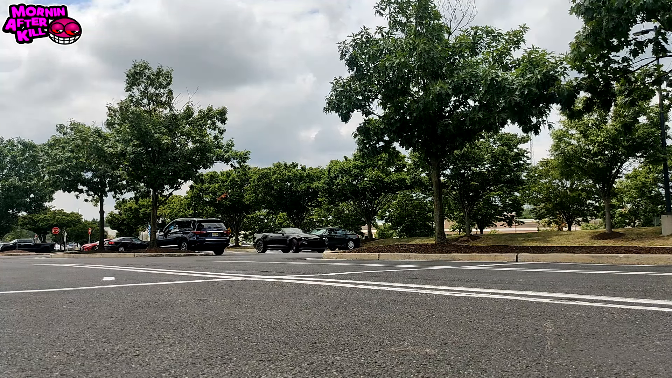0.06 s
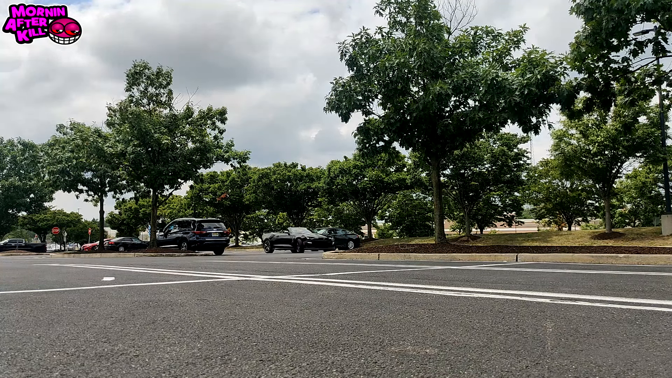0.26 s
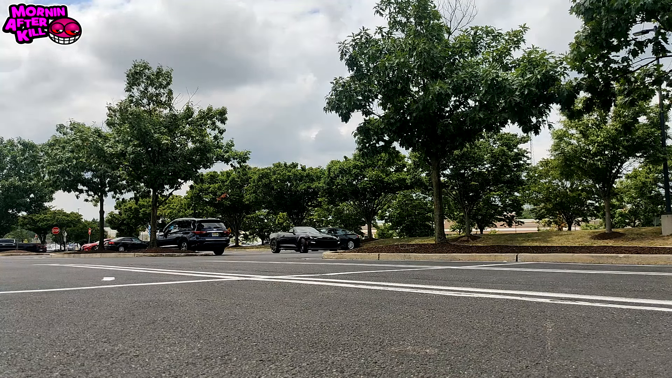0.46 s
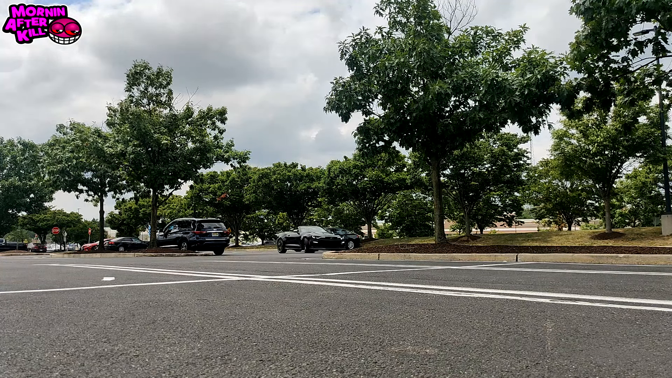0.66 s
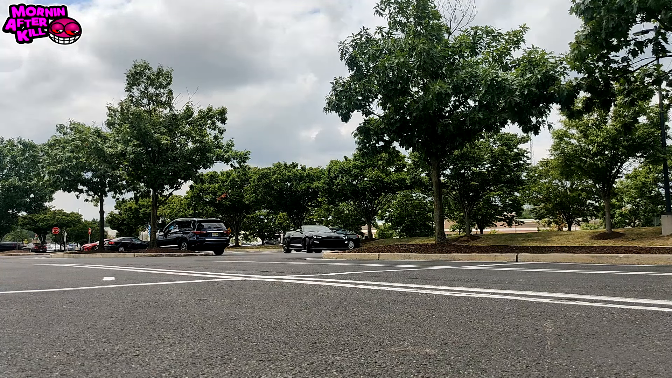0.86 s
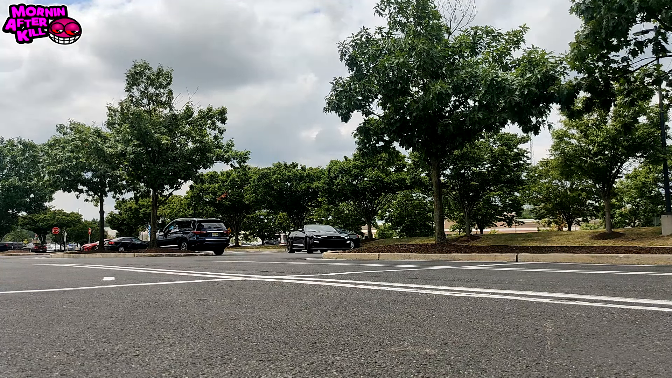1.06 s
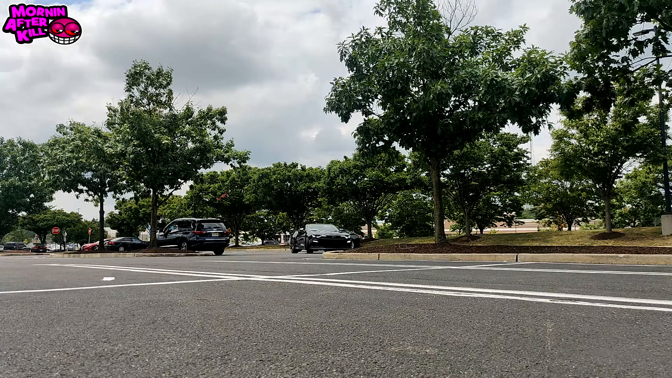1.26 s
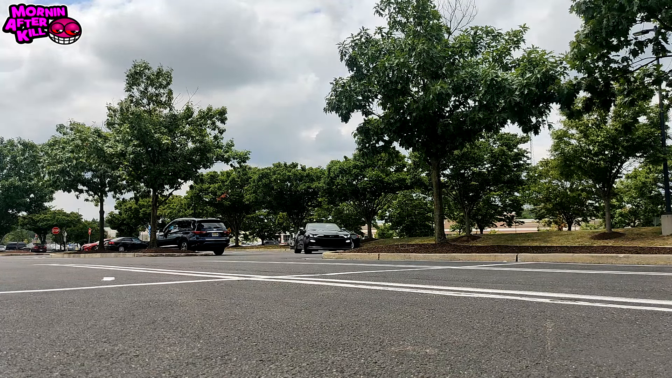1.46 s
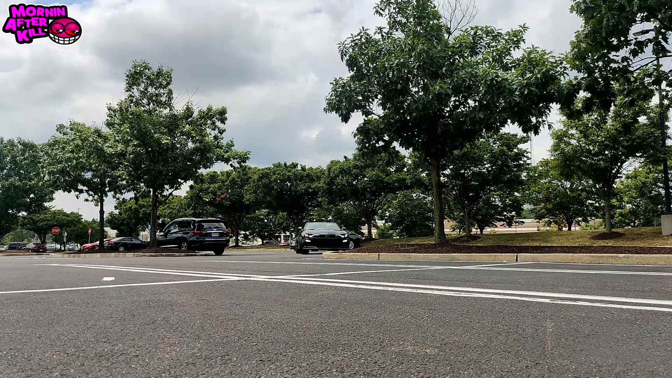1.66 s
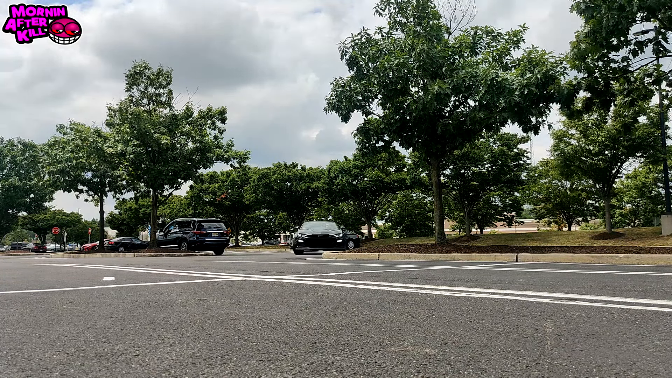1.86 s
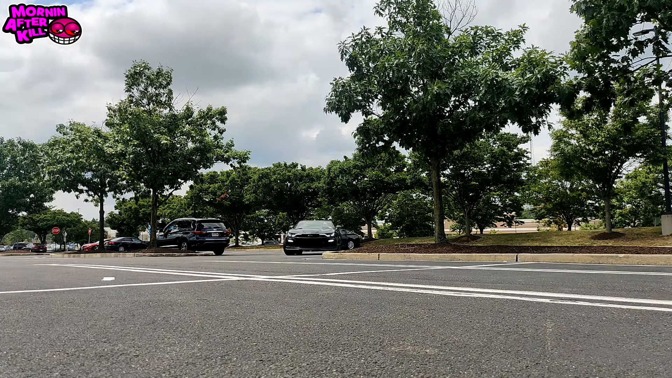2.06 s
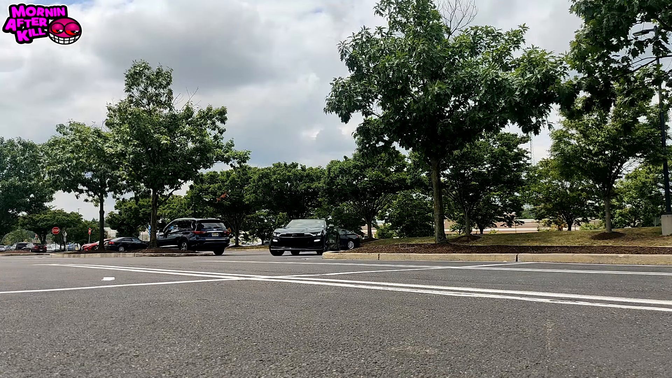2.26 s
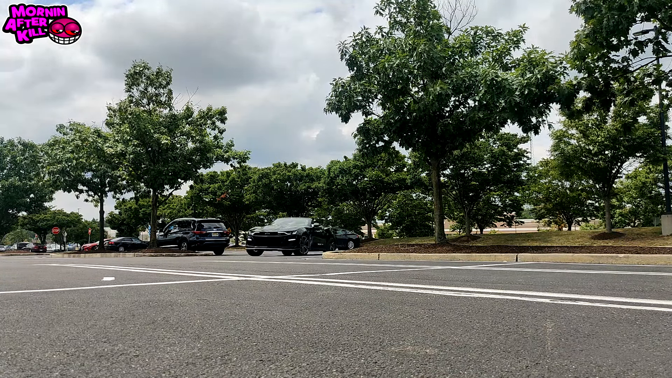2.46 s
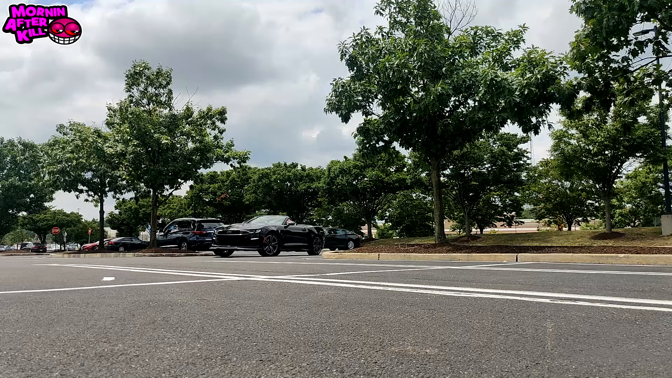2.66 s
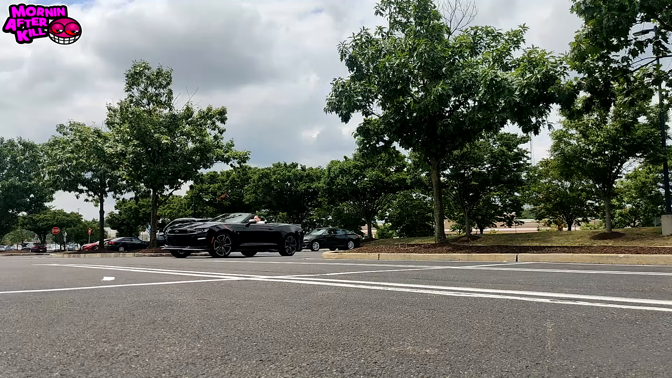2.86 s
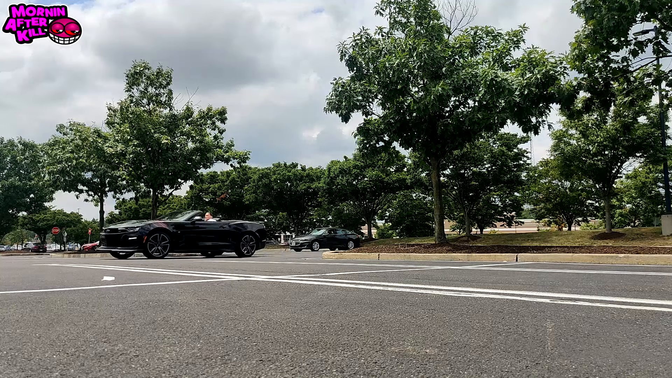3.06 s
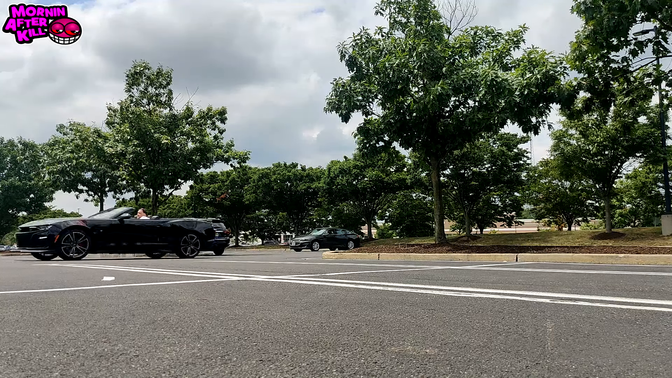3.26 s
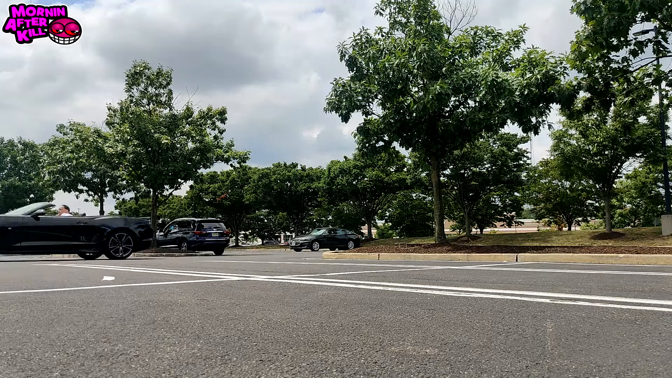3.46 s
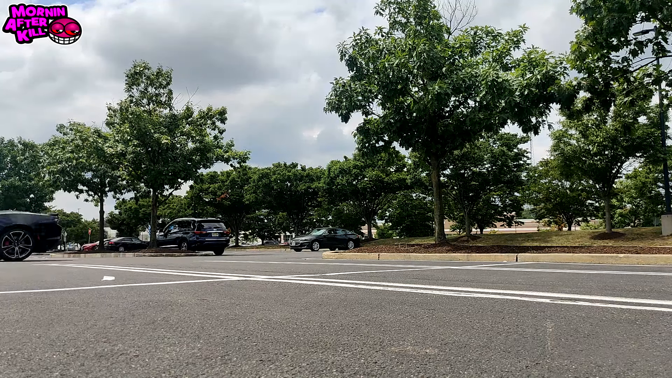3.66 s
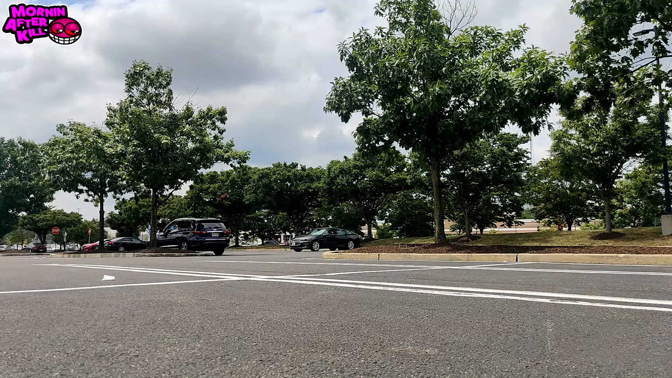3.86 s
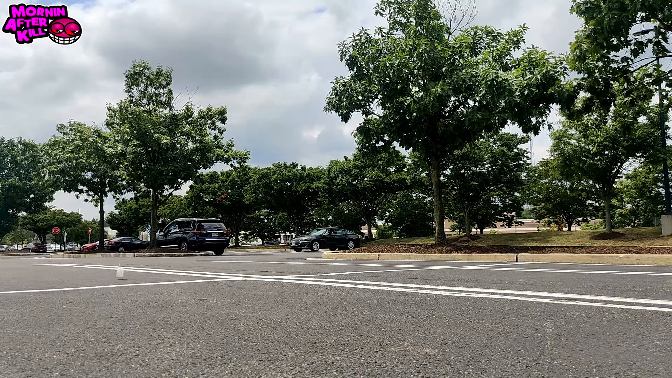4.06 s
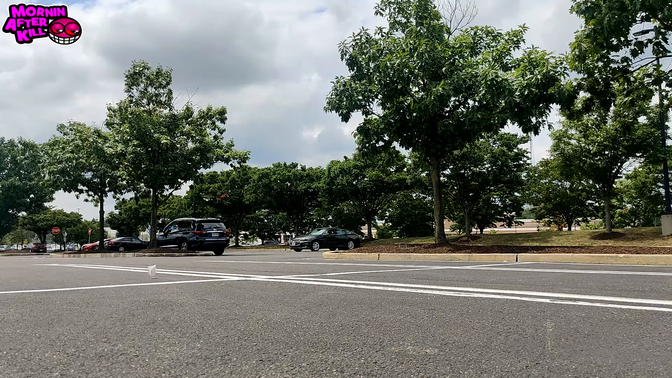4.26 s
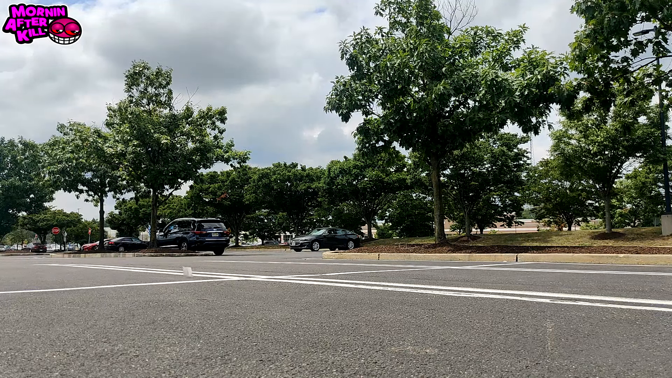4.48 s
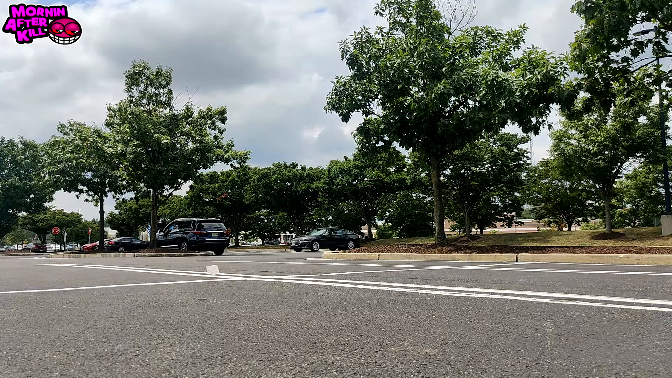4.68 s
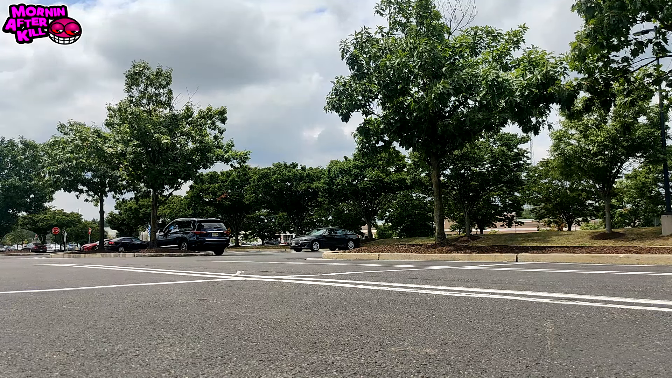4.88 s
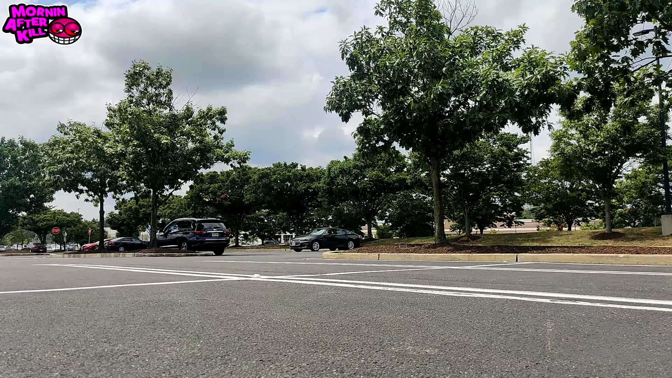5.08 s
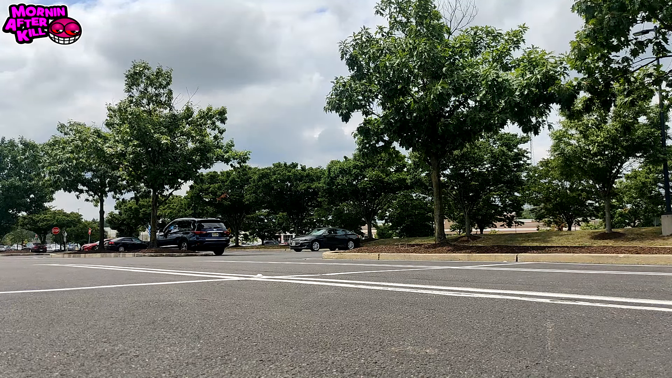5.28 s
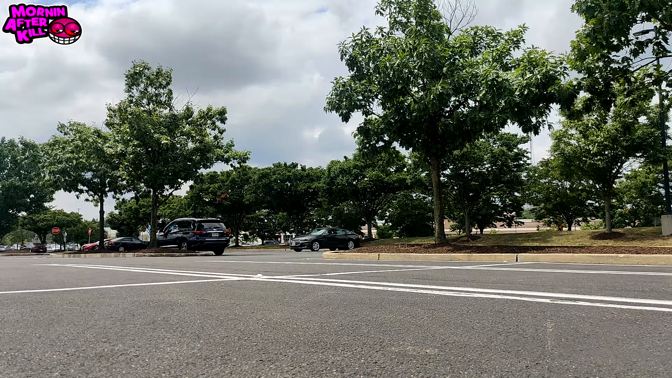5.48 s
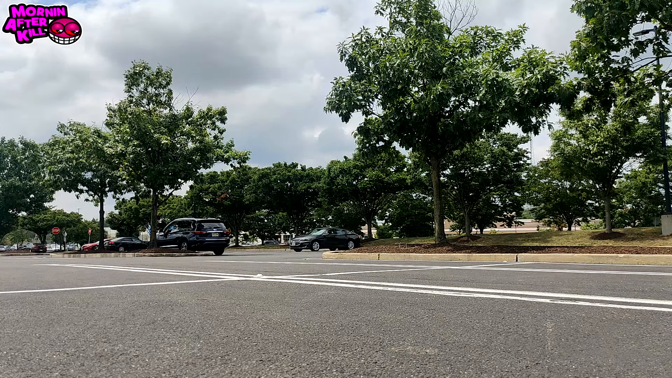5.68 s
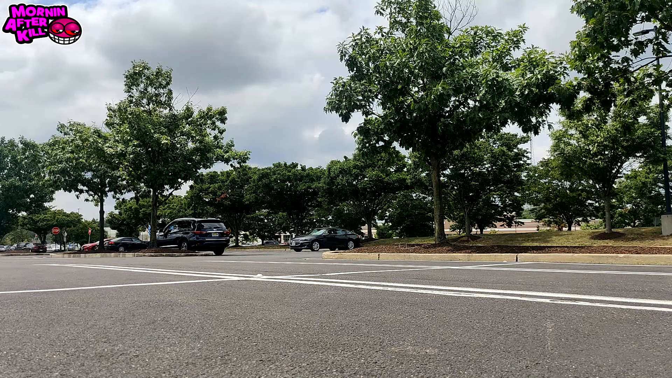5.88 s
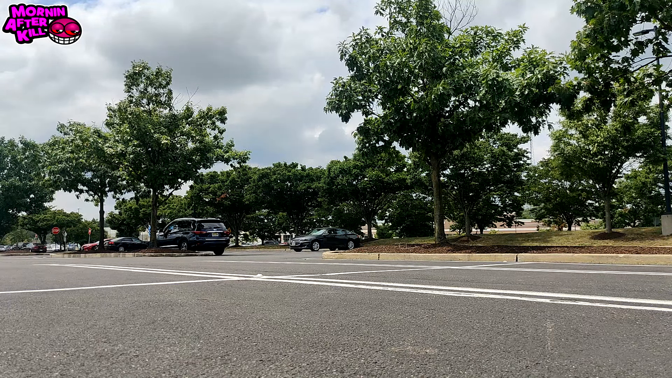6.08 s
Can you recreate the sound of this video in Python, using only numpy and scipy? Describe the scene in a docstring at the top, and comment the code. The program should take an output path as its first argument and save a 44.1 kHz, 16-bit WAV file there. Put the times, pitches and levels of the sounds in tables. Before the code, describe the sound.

Wind rumbles on the microphone as a V8 car accelerates past, its engine climbing, then dropping in pitch and fading.

```python
"""V8 convertible passing in a parking lot

The car rolls up, opens the throttle, passes right to left 2.4 m from a two-port microphone, lifts off
and burbles away. Its exhaust orders sweep through the pipe's resonances, tyres roar on the asphalt and
the lot's edges answer. Wind rumbles on the microphone over trees, far traffic and one bird; the
recorder's gain control ducks under the pass."""
import sys
import numpy as np
from scipy import signal
from scipy.fft import rfft, irfft, next_fast_len
from scipy.io import wavfile
from scipy.ndimage import uniform_filter1d, map_coordinates

SR = 44100
rng = np.random.default_rng(int(sys.argv[2]) if len(sys.argv) > 2 else 0)


def inscribe(sig):
    """Save sig as 16-bit PCM at rate SR to the path in sys.argv[1].

    A 1-D sig is mono; a 2-D sig holds one channel per row.
    Samples are clipped to [-1, 1] before scaling.
    """
    pcm = np.round(np.clip(np.atleast_2d(sig).T, -1, 1) * 32767)
    wavfile.write(sys.argv[1], SR, pcm.astype(np.int16))


N = 270330
TIME = np.arange(N) / SR
# the car's bearing at the microphone: t/s, lead of the left port/ms, left over right/dB
BEARING = [(0, -0.079, 4.5), (1.5, -0.27, 0), (2.25, 0.0089, 2), (3.25, 0.098, 0.9), (3.75, 0.1863, -0.3),
           (4.25, 0.42, 1), (4.75, 0.49, 2), (6.13, 0.48, 1)]


def amp(db):
    """Decibels to gain."""
    return 10 ** (np.asarray(db) / 20)


def unit(x):
    """Scale to rms 1."""
    return x / np.sqrt(np.mean(x ** 2) + 1e-20)


def along(points, hz):
    """Read (f/Hz, value) points on a log frequency axis."""
    f, v = np.transpose(points)
    return np.interp(np.log(hz + 1), np.log(f + 1), v)


def curves(rows):
    """One value per sample for each column after the time."""
    s, *cols = np.transpose(rows)
    return [np.interp(TIME, s, c) for c in cols]


def during(start, end, fade):
    """1 between two times, dying away outside."""
    return np.exp(-np.abs(TIME - np.clip(TIME, start, end)) / fade)


def swell(s, rise, fall, db):
    """A bell-shaped gain that peaks at time s."""
    return amp(db) * np.exp(-.5 * ((TIME - s) / np.where(TIME < s, rise, fall)) ** 2)


def wobble(rate):
    """A smooth random curve, rate knots a second."""
    coarse = TIME[::64]
    curve = map_coordinates(rng.standard_normal(2048), [coarse * rate], mode="wrap")
    return np.interp(TIME, coarse, curve)


def filtered(x, gain):
    """x times a gain that depends on frequency."""
    m = next_fast_len(N + 8192)
    return irfft(rfft(x, m) * gain(np.fft.rfftfreq(m, 1 / SR)), m)[..., :N]


def noise(spectrum, gate=1):
    """Gated noise of rms 1, coloured by (f/Hz, level/dB) points."""
    return unit(filtered(gate * rng.standard_normal(N), lambda hz: amp(along(spectrum, hz))))


def tick(s, db, pitch_hz):
    """A dry snap of noise, falling 21 dB an octave either side of its pitch."""
    snap = (TIME >= s) * during(s, s, fade=0.0013) * rng.standard_normal(N)
    return amp(db) * filtered(snap, lambda hz: unit(amp(-21 * np.abs(np.log2((hz + 1) / pitch_hz)))))


def air(spectrum, apart):
    """Noise common to both ports, plus a share of each port's own."""
    return unit(noise(spectrum) + apart * np.array([noise(spectrum), noise(spectrum)]))


def ports(x, scatter=0):
    """x[0] reaches the two ports at different times; x[1:], if given, is scattered from all around."""
    shift = curves(BEARING)[0] / 1000 * SR / 2  # half the lead, in samples
    direct = np.array([map_coordinates(x[0], [np.arange(N) + side * shift]) for side in (1, -1)])
    return direct if len(x) == 1 else (direct + scatter * np.array(x[1:])) / np.hypot(1, scatter)


def drive_by(pass_s=3.737, closest_m=2.42, car_m_per_s=9.1):
    """Nearness of the car on a straight path (1 at its closest) and its Doppler factor."""
    past_m = car_m_per_s * (TIME - pass_s)
    distance_m = np.hypot(closest_m, past_m)
    return closest_m / distance_m, 1 - car_m_per_s / 343 * past_m / distance_m


def surroundings():
    """The hush of the lot, far traffic receding and leaves rustling in gusts, a little to the left."""
    # spectra of the three: f/Hz, level/dB
    hush_colour = [(60, 0.5), (250, 7), (500, 9.5), (900, -12.5), (1500, -10.5), (2800, -27), (4500, -21.5),
                   (7000, -41), (9000, -64.5), (16000, -51)]
    traffic_colour = [(300, -42.5), (600, 0), (850, 1), (1300, -5), (2500, -13), (7000, -26),
                      (12000, -69.5)]
    leaf_colour = [(1500, -18.5), (2700, -11), (3500, -9.5), (4700, -13.5), (6500, -19.5), (9000, -26.5),
                   (16000, -37.5)]
    # gusts in the trees: t/s, rise/s, fall/s, level/dB
    gusts = [(.1, 0.54, 0.317, -50), (1.6, 0.38, 0.1, -46), (2.45, 0.45, 0.57, -42.5)]
    hush = amp(-40.5 + wobble(1.6)) * air(hush_colour, apart=0.93)
    traffic = amp(-38.5 - 1.62 * TIME) * air(traffic_colour, apart=1.0)
    rustle = sum(swell(*row) for row in gusts) * amp(-0.5 + 0.97 * wobble(12))
    leaves = rustle * air(leaf_colour, apart=3.5)
    return (hush + traffic + leaves) * amp([[.6], [-.6]])


def bird():
    """One short, wavering chirp, far off."""
    # the chirp: t/s, rise and fall/s, f/Hz, level/dB
    chirps = [(2.283, 0.045, 2910, -44)]
    return sum(swell(s, half, half, db) * np.sin(2 * np.pi * hz * TIME + 2 * wobble(200))
               for s, half, hz, db in chirps)


def wind():
    """Wind rumbles on the microphone, nearly alike at both ports."""
    # spectrum of the rumble: f/Hz, level/dB
    rumble = [(8, -6), (22, 2), (40, 1.5), (58, 1.5), (80, -3.5), (130, -7.5), (220, -11), (400, -30.5),
              (1500, -68)]
    return amp(-24.5 + 0.39 * wobble(0.68)) * air(rumble, apart=0.23) * amp([[.5], [-.5]])


def lot_reverb(x):
    """Trees, parked cars and buildings send back a thin, late answer."""
    # reverberation of the lot: f/Hz, time to fall 60 dB/s
    decay = [(100, 0.31), (500, 0.81), (2000, 0.16), (10000, 0.099)]
    hz, t, bins = signal.stft(rng.standard_normal((2, SR)), SR, nperseg=256)
    tail = signal.istft(bins * amp(-60 * t / along(decay, hz)[:, None]), SR, nperseg=256)[1]
    late = np.pad(x.mean(axis=0), (1200, 0))[None]
    return amp(-18) * signal.fftconvolve(late, tail / np.linalg.norm(tail[0]), axes=1)[:, :N]


def parked_cars_echo(x, delay_s=.16, dull_hz=900):
    """A row of parked cars returns one dull echo, which beats against the changing engine note."""
    return amp(-19) * filtered(x, lambda hz: np.exp(-2j * np.pi * hz * delay_s) / (1 + (hz / dull_hz) ** 2))


def tyres(near, diffuse_hz=5360):
    """Tread roar and fine hiss on coarse asphalt grow with nearness and in a turn; stones are flicked."""
    # spectra of the tread: f/Hz, level/dB
    roar_colour = [(100, -43), (400, 5), (900, 7), (1400, 4.5), (2200, 1), (3200, -6), (4700, -9.5),
                   (7000, -18), (9000, -25), (16000, -30.5)]
    hiss_colour = [(2000, -28), (6000, -14.5), (10000, -4.5), (13000, 0), (16000, 1.5)]
    # flicked stones: t/s, level/dB, f/Hz
    grit = [(3.907, -12, 3200), (4.673, -38.5, 11000), (4.915, -40, 14000)]
    scrub = swell(2.86, 0.17, 0.115, 0)  # out of the turn
    spread = 0.42 + 0.82 * near ** 2  # close by, the four wheels lie in different directions
    crossover = lambda hz: np.arctan((hz / diffuse_hz) ** 2)  # the treble arrives from all around
    aimed = ports([noise(roar_colour) for _ in range(3)], scatter=spread)
    diffuse = np.array([noise(roar_colour), noise(roar_colour)])
    roar = filtered(aimed, lambda hz: np.cos(crossover(hz)))
    roar += filtered(diffuse, lambda hz: np.sin(crossover(hz)))
    roar *= np.hypot(amp(-22) * near ** 1.16, amp(-26.5) * scrub) * amp(0.57 * wobble(19))
    grain = amp(1.7 * wobble(280))
    hiss = ports([noise(hiss_colour, grain) for _ in range(3)], scatter=3.9)
    hiss *= np.hypot(amp(-50.5) * near ** 0.52, amp(-46.5) * scrub)
    stones = sum(tick(*row) for row in grit)
    return roar * amp([[.4], [-.4]]) + hiss * amp([[1.6], [-1.6]]) + ports([stones])


def pipe(hz, ring):
    """Gain of the exhaust: the muffler's slope with standing-wave peaks, scaled by ring."""
    # muffler response: f/Hz, level/dB
    muffler = [(30, -36), (100, -16.5), (200, -5.5), (380, -8), (560, -6), (680, -8), (850, -9),
               (1050, -14.5), (1250, -17.5), (2000, -21.5), (4000, -68.5)]
    # pipe resonances: f/Hz, width/Hz, level/dB
    resonances = [(275.4, 99, 8), (368, 52, 4), (438.1, 35.4, 11), (532.4, 14, 5), (673, 23, 4.5),
                  (798, 22, 6)]
    peaks_db = sum(db / (1 + (2 * (hz - centre) / width) ** 2) for centre, width, db in resonances)
    return amp(along(muffler, hz) + ring * peaks_db)


def swept_pipe(hz, ring):
    """The pipe's gain along a gliding pitch, worked out every 64 samples."""
    return np.interp(TIME, TIME[::64], pipe(hz[::64], ring))


def tone(cycle, order, drift):
    """One harmonic of the engine cycle, its phase wandering by about drift radians."""
    return np.sqrt(2) * np.sin(2 * np.pi * (order * cycle + rng.random()) + drift * wobble(22))


def firings(cycle, sharpness):
    """Envelope of one gas puff per firing, eight a cycle, each of its own size."""
    count, age = np.divmod(8 * cycle, 1)
    size_db = 3 * rng.standard_normal(4096)
    return amp(size_db[count.astype(int)]) * np.exp(-sharpness * age)


def gas_jet(cycle):
    """Gas hisses out, surging with each firing, as the tailpipes turn to the microphone."""
    # spectrum of the jet: f/Hz, level/dB
    colour = [(200, -22), (900, 1.5), (1700, 0), (2500, 3), (4500, -6), (7000, -15.5), (9000, -30.5),
              (16000, -33)]
    # blasts of gas: t/s, rise/s, fall/s, level/dB
    blasts = [(3.605, 0.068, 0.13, -19), (3.807, 0.018, 0.025, -22), (3.875, 0.061, 0.08, -18.5)]
    surge = 1 + firings(cycle, sharpness=0.65)
    hiss = ports([noise(colour, surge) for _ in range(3)], scatter=1.61)
    return sum(swell(*row) for row in blasts) * hiss


def cracks():
    """Sharp cracks in the exhaust under load."""
    # cracks: t/s, level/dB
    snaps = [(3.229, -10), (3.856, -8), (3.89, -7)]
    return sum(tick(s, db, pitch_hz=900) for s, db in snaps)


def bark(cycle):
    """Heard close behind the car, each bank barks once a cycle, the weaker half a cycle later."""
    # spectrum of a bark: f/Hz, level/dB
    colour = [(250, -29.5), (600, 0.5), (1000, 15), (1600, -1), (2400, 1.5), (5000, -41.5), (12000, -65)]
    beat = lambda turns: np.diff(np.floor(turns), prepend=np.floor(turns[0]))
    blows = (beat(cycle) + amp(-11.5) * beat(cycle + .5)) * amp(2.8 * wobble(40))
    return during(3.48, 4.7, fade=.03) * unit(filtered(blows, lambda hz: amp(along(colour, hz))))


def puffs(cycle, load):
    """Turbulent gas puffs through the pipe, stronger off the throttle."""
    turbulence = firings(cycle, sharpness=0.9) * rng.standard_normal(N)
    return amp(4.6 - 13.3 * load) * unit(filtered(turbulence, lambda hz: pipe(hz, ring=0.69)))


def lope(cycle, speed, near, smooth_hz=30):
    """Gain flutter from uneven cylinders: a growl at low revs, away from the microphone."""
    shake = unit(sum(tone(cycle, order, drift=.8) for order in (1, 2, 3)))
    return 1 + 0.52 * np.maximum(1 - (speed / smooth_hz) ** 2, 0) * (1 - near) * shake


def booms(cycle, car_hz, load, near, leading, drone_order):
    """Leading orders sing as they cross a resonance under load; single orders boom at set times."""
    # booms: t/s, rise/s, fall/s, level/dB, order
    swells = [(1.9, 0.48, 0.063, -42, 31), (2.19, 0.078, 0.1336, -18, 8), (2.185, 0.12, 0.028, -22.5, 16),
              (2.57, 0.079, 0.056, -27, 16), (2.62, 0.31, 0.23, -24.5, 5), (2.61, .17, .15, -27.5, 9),
              (2.83, 0.025, .03, -24, 20), (2.89, 0.069, 0.042, -24.5, 16), (2.86, 0.052, 0.2, -30.5, 19),
              (3.215, 0.1, 0.096, -24.5, 10), (3.15, 0.05, 0.079, -25.5, 16), (3.21, .06, 0.072, -29, 24),
              (3.41, .04, .07, -24, 26), (3.6, .08, 0.1, -16, 18), (3.39, 0.059, 0.072, -21.5, 22),
              (3.66, 0.073, 0.085, -10, 16), (3.672, 0.16, 0.14, 0, 8), (3.66, 0.032, .045, -15.5, 24),
              (3.935, 0.018, 0.043, -9, 16), (3.97, 0.055, 0.031, -13, 10), (4.03, 0.057, 0.083, -22, 8),
              (4.08, 0.035, 0.061, -19, 16), (4.1, .03, 0.032, -19, 22), (4.28, 0.042, 0.042, -22, 18),
              (3.6, 0.14, 0.2, -25.5, 12)]
    # late burns in the pipe off the throttle: t/s, level/dB
    late_burns = [(4.115, -17), (4.645, -20), (4.775, -21.5), (5.01, -22.5)]
    gains = {order: amp(db) * load * near * swept_pipe(order * car_hz, ring=1.754)
             for order, db in leading.items()}  # steady orders build up the resonances more
    for *shape, order in swells:
        gains[round(order)] = gains.get(round(order), 0) + swell(*shape)
    for s, db in late_burns:
        gains[drone_order] = gains.get(drone_order, 0) + swell(s, 0.0082, 0.0152, db)
    flicker_db = .3 + 1.8 * (1 - near) ** 2
    drift = .05 + .25 * (1 - near) ** 2 + .4 * (1 - load)
    return sum(gain * amp(flicker_db * wobble(25)) * tone(cycle, order, drift)
               for order, gain in gains.items())


def burble(cycle, car_hz, load, leading, drone_order):
    """The V8 burble: orders 3 to 47 through the pipe, wavering more off the throttle."""
    # uneven firing within each bank favours some orders: order, level/dB
    favoured = [(6, 3), (7, -2), (9, 5.5), (11, 5), (12, 2), (18, 1.5), (20, 3.5), (26, 3), (34, 2)]
    favour_db = {round(order): db for order, db in favoured}
    ring = 1 - 0.17 * load[::64]  # fast gas flow damps the resonances
    shares = {order: 1 - load for order in leading}  # under load these sing clean instead
    shares[drone_order] = amp(5 - 2 * load)
    total = np.zeros(N)
    for order in range(3, 48):
        gain = shares.get(order, 1) * amp(favour_db.get(order, 0) + (3.6 - 1.1 * load) * wobble(12))
        total += gain * swept_pipe(order * car_hz, ring) * tone(cycle, order, drift=.6 - .47 * load)
    return total


def engine(near, doppler, open_s=2.12, lift_s=4.13, drone_order=12):
    """The V8 revs up and lifts off; its firing cycle drives the sounds of the exhaust."""
    # engine speed: t/s, cycle rate/Hz
    revs = [(0, 14.34), (2.0, 14.2), (2.19, 16.8), (2.3, 19.2), (2.65, 24.6), (2.8, 27.3), (2.92, 28.4),
            (3.06, 28.2), (3.17, 28.1), (3.3, 29.9), (3.498, 33.22), (3.57, 34.0), (3.706, 33.7),
            (3.775, 34), (3.808, 31.6), (3.98, 26.7), (4.13, 24.15), (4.45, 23.5), (4.65, 20.6), (5, 21.6),
            (5.5, 18.7), (6.13, 14.8)]
    # how hard the engine works: t/s, level/dB
    effort = [(0, -36.5), (1.2, -29), (2.1, -24), (2.7, -16), (2.83, -11), (3.0, -18.5), (3.28, -21.5),
              (3.39, -17), (3.6, -13.5), (3.9, -14.5), (4.12, -18), (4.2, -27.5), (5.2, -20.5), (6.13, -24)]
    # orders that sing clean under load: order, level ahead of the pipe/dB
    clean_orders = [(8, -20.5), (10, -24), (14, -23.5), (16, -26.5)]
    leading = {round(order): db for order, db in clean_orders}
    speed, = curves(revs)
    car_hz = speed / doppler
    load = during(open_s, lift_s, fade=0.022)
    unevenness = .001 + .004 * (1 - load)  # combustion is steadier under load
    cycle = np.cumsum(speed * (1 + unevenness * wobble(30))) / SR
    cycle -= np.interp(3.555, TIME, cycle)  # one bark falls at this time
    boom = booms(cycle, car_hz, load, near, leading, drone_order) * lope(cycle, speed, near)
    body = burble(cycle, car_hz, load, leading, drone_order) + puffs(cycle, load)
    # no two cycles burn alike, least of all on the overrun
    stumble_db = (3.4 - 2 * load * speed / speed.max()) * np.tanh(wobble(28))
    level = near * amp(curves(effort)[0] - 7.5)
    exhaust = boom + level * (amp(stumble_db) * body + bark(cycle))
    jet = gas_jet(cycle)
    exhaust += cracks()
    return ports([exhaust + parked_cars_echo(exhaust)]) + jet


def scene():
    """The car, the lot's answer and the open air at the microphone."""
    near, doppler = drive_by()
    car = engine(near, doppler) + tyres(near)
    left_db = curves(BEARING)[1]
    return car * amp([left_db / 2, -left_db / 2]) + lot_reverb(car) + wind() + surroundings() + bird()


def record(dry, limit_db=-6.2, recover_db_per_s=14, top_hz=15900):
    """The recorder turns loud sound down, recovers slowly, rounds off peaks and cuts the top treble."""
    power = np.abs(uniform_filter1d(np.mean(dry ** 2, axis=0), size=1024))
    over_db = np.maximum(10 * np.log10(power + 1e-12) - limit_db, 0)
    recovery_db = recover_db_per_s * TIME
    held = dry * amp(recovery_db - np.maximum.accumulate(over_db + recovery_db))
    rounded = held / (1 + np.abs(held) ** 10) ** (1 / 10)
    return filtered(rounded, lambda hz: hz < top_hz)


dry = scene()
out = record(dry)
inscribe(out)
```